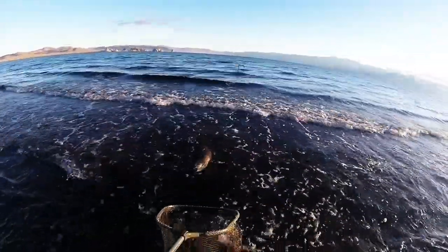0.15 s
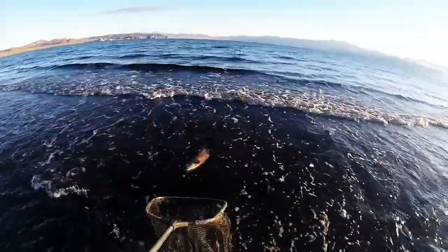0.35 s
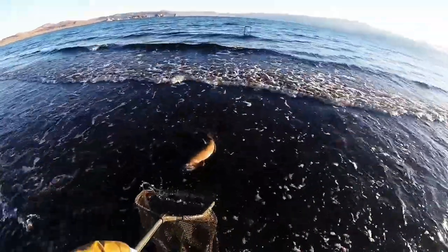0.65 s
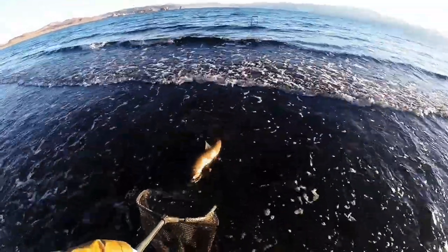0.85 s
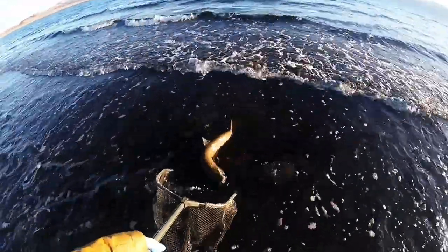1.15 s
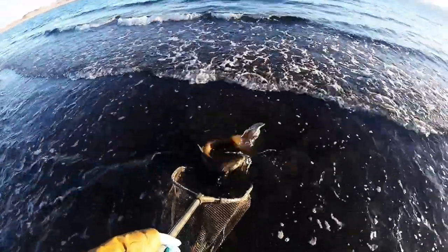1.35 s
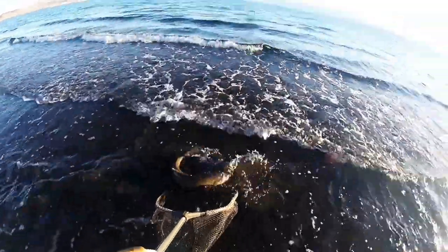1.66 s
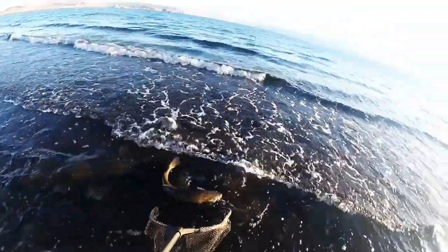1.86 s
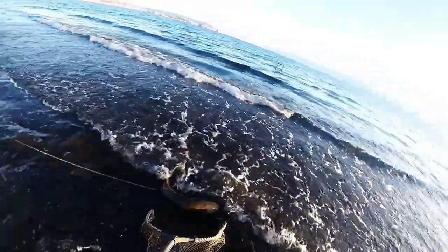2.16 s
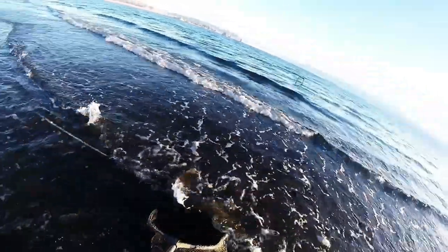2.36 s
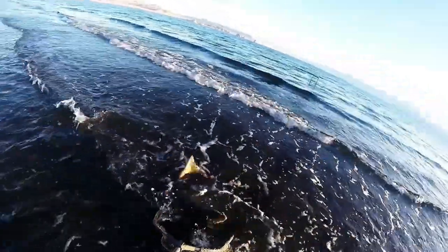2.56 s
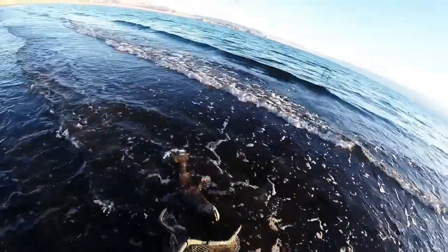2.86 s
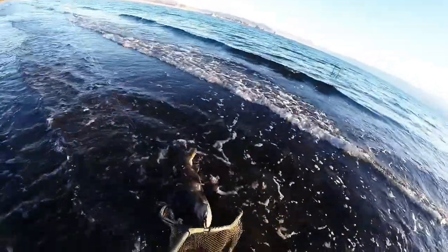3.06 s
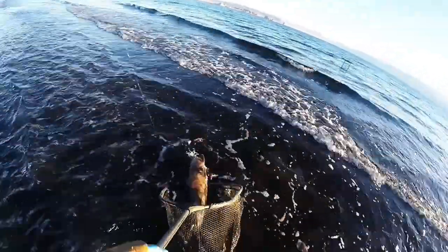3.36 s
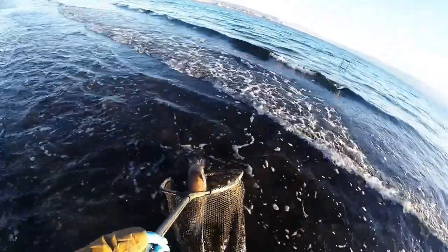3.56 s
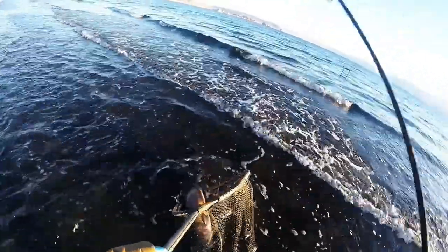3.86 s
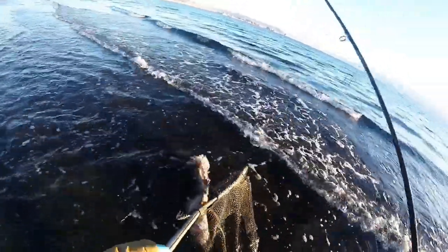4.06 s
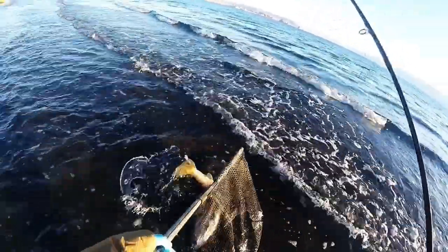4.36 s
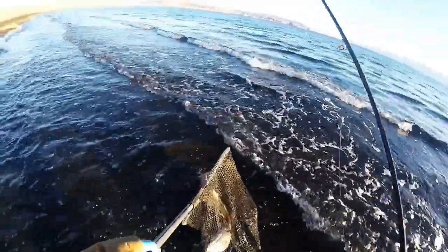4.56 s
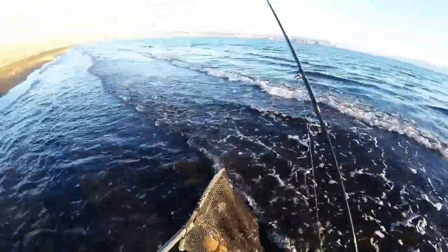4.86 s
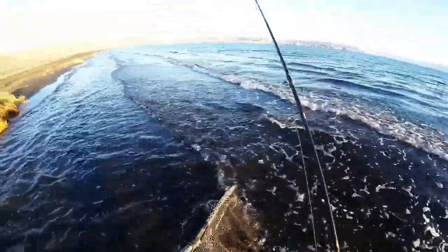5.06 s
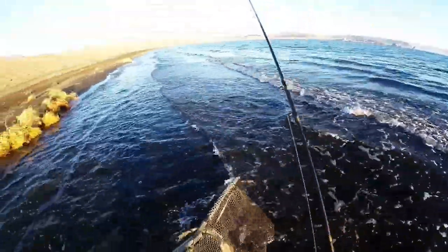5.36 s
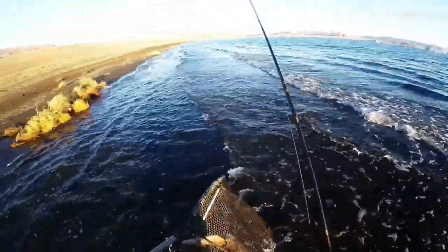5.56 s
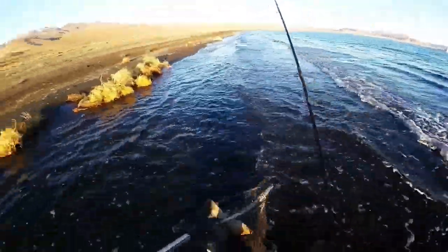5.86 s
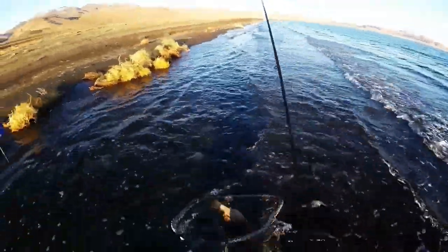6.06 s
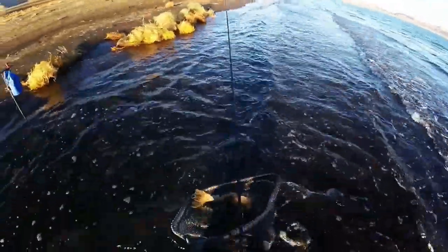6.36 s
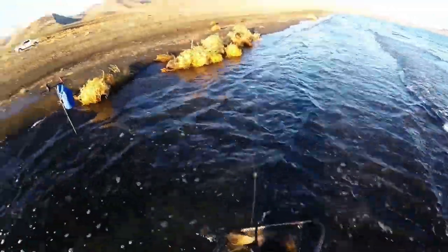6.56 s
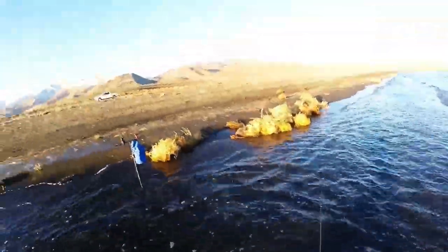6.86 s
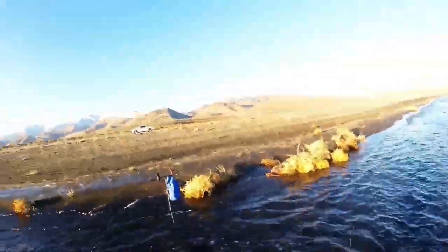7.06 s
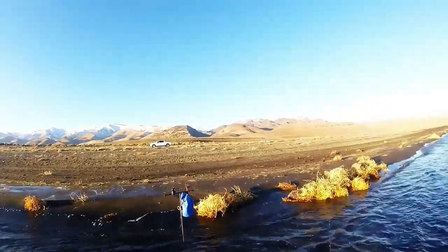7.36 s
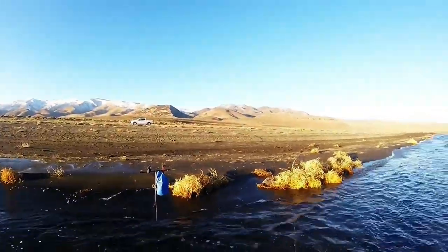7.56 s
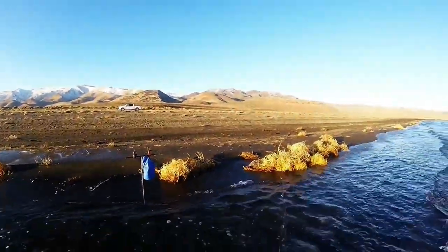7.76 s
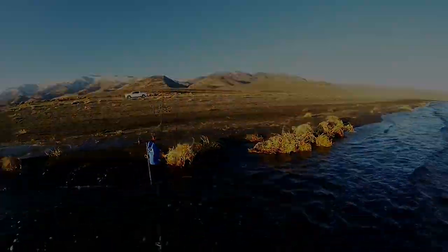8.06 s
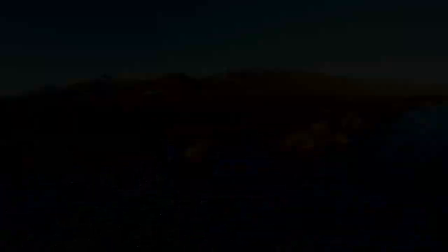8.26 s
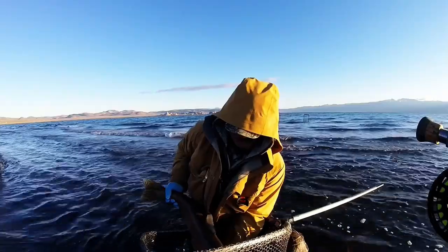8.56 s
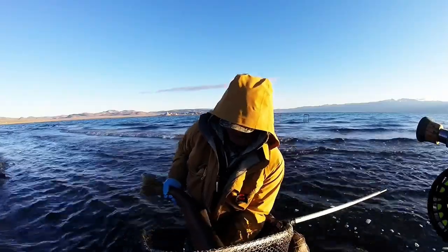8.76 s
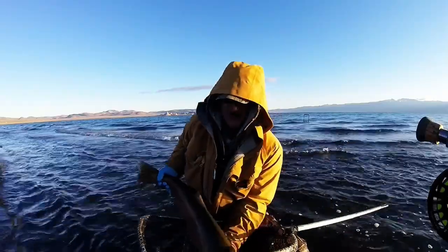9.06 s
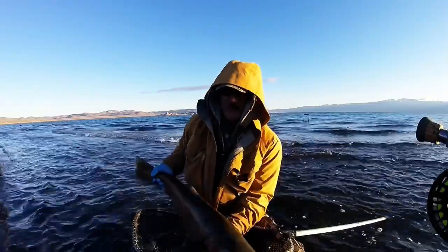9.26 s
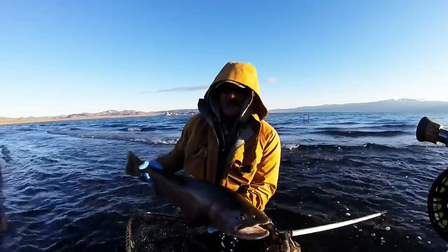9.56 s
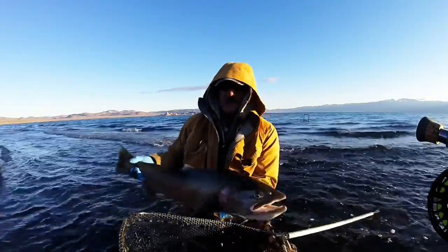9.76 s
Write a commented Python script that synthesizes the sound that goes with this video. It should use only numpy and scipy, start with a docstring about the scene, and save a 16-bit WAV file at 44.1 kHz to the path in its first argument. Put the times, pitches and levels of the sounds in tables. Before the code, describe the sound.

Small lake waves slosh, bubble and fizz close to a body-worn microphone from the start, with low wind rumble and bright ticks of spray. A fish thrashes at a landing net: light slaps come at about 0.6 and 1 second, the sharpest at 1.5, and more near 2.9, 3.4, 4.1 and 5 seconds, among foamy splashes and hollow gulps. Gusts buffet the microphone around 1.5 seconds, then build from 3 seconds to their heaviest thumping near 4, easing by 5. The water grows calmer after 6 seconds, with a small gust near 7. A faint, high ping of metal tackle sounds at 7.8 seconds, and everything fades to a brief silence. At 8.4 seconds quieter lapping opens close to the water, with small gurgles, drips and a dying breeze until about 10 seconds.

```python
"""Small waves break and fizz around an angler wading in a lake; their sound is many ringing bubbles.
A fish thrashes at the landing net with sharp slaps, air pockets gulp, and metal tackle pings once.
Gusts buffet a body-worn camera, whose waterproof case rings in the treble as spray hits it.
This first scene fades out, and a second, quieter one opens low over lapping water."""
import sys
import numpy as np
from scipy import signal
from scipy.fft import rfft, irfft, next_fast_len
from scipy.io import wavfile

SR = 44100
rng = np.random.default_rng(int(sys.argv[2]) if len(sys.argv) > 2 else 0)


def file_out(sig):
    """Save sig as 16-bit WAV at sys.argv[1]."""
    # one column per channel
    cols = np.atleast_2d(sig).T
    # limit, then scale
    lim = np.clip(cols, -1, 1)
    pcm = np.round(lim * 32767).astype(np.int16)
    wavfile.write(sys.argv[1], SR, pcm)


N = 437028
TIME = np.arange(N) / SR
FADE_START_S, SECOND_SCENE_S = 7.9, 8.41
GUST_RISE, SPLASH_RISE, LAP_RISE = 0.53, 0.51, 0.45  # share of each one's length spent rising

# How the waves swell in each scene.
# Each row: time in seconds, base level of the slosh in dB, base level of the breaking crests in dB.
WADING_SWELL = [(0, -37, -40), (0.3, -42, -44.5), (0.65, -39, -42.5), (1.35, -40.0, -44), (2, -38.5, -43.5),
                (2.6, -40, -43.0), (3.2, -43.0, -46.5), (4, -40, -42), (4.45, -39.5, -41.5),
                (5, -39.5, -43.0), (5.5, -42.0, -43.5), (5.82, -41.5, -47.5), (6.08, -44, -50),
                (6.65, -46.0, -50.5), (6.92, -42.0, -50.0), (7.15, -45.5, -51.5), (7.9, -43.5, -52.5)]
LAPPING_SWELL = [(8.44, -51, -57), (9, -50, -56), (9.45, -49.5, -56.5), (9.67, -46.0, -52.5),
                 (9.8, -48.5, -57), (9.89, -51.5, -58)]
# The tone of the water in each scene. Each row: frequency in Hz, relative strength in dB.
WADING_TONE = [(60, -35.5), (160, -4), (230, -0.5), (400, -1), (650, -5), (1180, -6.5), (1430, -12),
               (2000, -7.5), (2450, -8.5), (2950, -14.5), (3600, -17), (4400, -22), (8000, -19),
               (12500, -47)]
LAPPING_TONE = [(60, -27), (160, -4), (240, -3), (400, -3.5), (1000, -7), (1500, -9), (2600, -15),
                (3500, -22), (4300, -27), (6000, -25.5), (6900, -12.5), (9500, -26.5), (11000, -41),
                (13000, -36)]
# Thrown water and bursting foam.
# Each row: peak time in seconds, length in seconds, fizz level in dB, rush level in dB.
FOAMY_SPLASHES = [(0.16, 0.22, -47, -54), (0.46, 0.09, -40, -57), (0.61, 0.069, -41, -48),
                  (0.92, 0.18, -39, -45), (0.97, 0.062, -35.5, -41), (1.555, 0.063, -41, -46),
                  (1.73, .1, -39, -41.5), (2.21, .1, -37.5, -53), (2.31, 0.23, -41, -47),
                  (2.67, .08, -43, -47), (2.86, 0.098, -43, -48), (3.47, 0.4, -47, -51),
                  (4.46, 0.15, -38.5, -43), (4.75, 0.053, -39, -40), (5.38, 0.24, -38.5, -57),
                  (5.76, 0.45, -41, -46.5), (6.29, 0.087, -55, -50), (6.72, .05, -42.5, -58),
                  (6.98, 0.15, -50, -67), (7.68, 0.18, -47, -68), (7.79, .04, -46, -61),
                  (7.89, 0.062, -52, -56), (8.61, .05, -49, -67), (9.44, .14, -48, -70),
                  (9.565, 0.065, -48, -56), (9.865, 0.03, -43, -50)]
# Little waves close by. Each row: peak time in seconds, length in seconds, slosh level in dB.
NEAR_LAPS = [(1.545, 0.043, -38), (3.45, 0.029, -41.5), (4.18, .05, -41), (4.5, .05, -41),
             (6.945, .04, -45), (8.635, .06, -48.5), (8.77, .05, -51), (9.14, .08, -57)]
# Slaps on the water and the net. Each row: start in seconds, relative level in dB, main pitch in Hz.
FISH_SLAPS = [(0.582, -30, 2230), (0.994, -27, 2270), (1.5359, -11, 2360), (2.86, -23, 2160),
              (3.432, -29, 1790), (4.1479, -20.5, 1300), (4.998, -29, 2020)]
# Extra tones in a slap. Each row: pitch in Hz, level against the main tone in dB, ring time in seconds.
SLAP_TONES = [(760, -12, 0.027), (3620, 1, 0.0034)]
# Spray hitting the case. Each row: start in seconds, relative level in dB, rough pitch in Hz.
SPRAY_DROPS = [(0.4818, -22, 6410), (0.8704, -25, 7800), (1.5364, -23.5, 6440), (2.193, -23.5, 5750),
               (2.295, -19, 6160), (2.43, -25, 6540), (2.682, -15, 6750), (3.4323, -25.5, 6200),
               (3.685, -24, 6260), (4.462, -22, 6500), (4.7217, -22, 6370), (5.3767, -21, 6700),
               (5.3953, -24, 6370), (5.512, -23.5, 6260), (5.749, -22, 6400), (5.876, -24.5, 6900),
               (7.1571, -33, 5630), (8.5984, -30.5, 6850), (8.9675, -33, 6650), (9.2179, -35, 6840),
               (9.488, -30, 6950), (9.5595, -29, 6800), (9.866, -32, 6800)]
# Large pockets of air.
# Each row: start in seconds, relative level in dB, starting pitch in Hz, ring time in seconds.
AIR_POCKETS = [(0.392, -24, 314, 0.062), (0.714, -31, 503, 0.092), (2.29, -32, 360, 0.083),
               (3.586, -23, 203, 0.055), (4.169, -25, 505, 0.048), (4.953, -33, 355, 0.065),
               (5.613, -26, 266, 0.077), (5.671, -25.5, 430, 0.063), (8.611, -37.5, 372, 0.073),
               (8.749, -36, 316, 0.063), (9.146, -39, 677, 0.066), (9.537, -38, 450, 0.074),
               (9.688, -32.5, 428, 0.058)]
# Where the waterproof case rings. Each row: frequency in Hz, width in Hz, boost in dB.
CASE_RINGS = [(5570, 1400, 15.5), (6484, 380, 11), (7020, 690, 5), (10000, 3000, 9)]
# Wind hitting the case.
# Each row: peak time in seconds, length in seconds, rumble level in dB, flutter level in dB.
WIND_GUSTS = [(0.12, .22, -39, -32), (0.29, 0.05, -39, -34.5), (0.64, .08, -35.5, -43),
              (0.83, 0.048, -38, -36.5), (1.4, 0.25, -36, -37), (1.58, 0.35, -32, -38),
              (1.99, 0.07, -34, -43), (2.17, .14, -54, -52), (2.99, 0.34, -35, -43.5),
              (3.27, 0.14, -29, -33.5), (3.45, 0.2, -27, -30), (3.64, 0.36, -26, -31),
              (3.85, .1, -21.5, -23.5), (3.95, 0.16, -22, -42), (4.045, 0.083, -21, -27),
              (4.19, 0.092, -31.5, -45.5), (4.35, 0.26, -32, -42.5), (4.47, 0.11, -45, -35),
              (4.58, 0.16, -29, -53), (4.78, .25, -46, -50), (6.91, 0.079, -33, -67),
              (7.05, 0.083, -37.5, -55), (7.78, 0.19, -41.5, -64), (8.77, .06, -43.5, -58),
              (8.94, .11, -43, -59)]
# The tone of light wind, strong wind and flutter. Each row: frequency in Hz, relative strength in dB.
LIGHT_WIND_TONE = [(8, 14), (25, 0), (55, -7.5), (85, -14), (130, -35), (400, -63.5)]
STRONG_WIND_TONE = [(8, -14.5), (25, -6), (48, -0.5), (85, -8), (130, -21), (400, -75.5)]
FLUTTER_TONE = [(50, -24), (95, -3.5), (135, -6), (190, -10), (280, -22.5), (500, -37.5), (1500, -61)]


def waves(swell, tone, slosh_db, rush_db, foam_db, calm_db, lively_db,
          far_db, fizz_clump_db, trickle_db, foam_hz):
    """Large bubbles slosh, small ones rush in the crests, foam crackles and fine drips trickle."""
    times, *columns = np.transpose(swell)
    water_db, crest_db = (np.interp(TIME, times, column) for column in columns)
    slosh_level = lifted(water_db + slosh_db, surges(NEAR_LAPS, LAP_RISE))
    rush_level = lifted(crest_db + rush_db, surges(FOAMY_SPLASHES, SPLASH_RISE, column=1))
    fizz_level = lifted(crest_db + foam_db, surges(FOAMY_SPLASHES, SPLASH_RISE))  # crests leave foam
    large = bubbles(220, 1400, per_s=600, spread_db=2.5, cycles=24, rise=.15)
    medium = bubbles(350, 1600, per_s=400, spread_db=2.5, cycles=28, rise=.15)
    small = bubbles(1400, 4600, per_s=1200, spread_db=3, cycles=24, rise=.08)
    drips = bubbles(5500, 9500, per_s=250, spread_db=3.5, cycles=45, rise=.04)
    foam = unit_level(patter(per_s=1500, spread_db=4))
    deep = water_layer(large, tone, far_db, clump_db=.5, clump_hz=18, band_hz=(60.2, 1410))
    shallow = water_layer(medium, tone, far_db, clump_db=0, clump_hz=18, band_hz=(202, 1600))
    lively = np.clip((slosh_level - calm_db) / (lively_db - calm_db), 0, 1)
    slosh = np.sqrt(lively) * deep + np.sqrt(1 - lively) * shallow  # lively water traps larger bubbles
    rush = water_layer(small, tone, far_db, clump_db=0.77, clump_hz=22, band_hz=(1420, 4620))
    fizz = water_layer(foam + amp(trickle_db) * drips, tone, far_db=6.5,
                       clump_db=fizz_clump_db, clump_hz=35, band_hz=(foam_hz, 16000))
    return amp(slosh_level) * slosh + amp(rush_level) * rush + amp(fizz_level) * fizz


def water_layer(near, tone, far_db, clump_db, clump_hz, band_hz):
    """Near bubbles and the smooth wash of far ones arrive in clumps, heard through the case."""
    far = amp(far_db) * rng.standard_normal(N)
    water = (unit_level(near) + far) * amp(clump_db * wander(clump_hz))
    return unit_level(filtered(water, lambda hz: tone_db(tone, hz) + case_db(hz) + band_db(hz, *band_hz)))


def bubbles(lo_hz, hi_hz, per_s, spread_db, cycles, rise, sizes=28):
    """A cloud of bubbles of many sizes, each ringing for the same number of cycles."""
    out = np.zeros(N)
    for hz in np.geomspace(lo_hz, hi_hz, sizes):
        ring = hz * bubble(hz, cycles / hz, rise)
        births = patter(per_s / sizes, spread_db)
        starts = np.flatnonzero(births)
        positions = starts[:, None] + np.arange(len(ring))
        rings = np.outer(births[starts], ring)
        out += np.bincount(positions.ravel(), rings.ravel(), N)[:N]  # add each ring in its place
    return unit_level(out)


def bubble(hz, ring_s, rise):
    """An air pocket rings, rising in pitch as it nears the surface; it fades by 60 dB in ring_s."""
    t = np.arange(0, max(ring_s, 2 / hz), 1 / SR)
    ring = np.sin(2 * np.pi * hz * t * (1 + rise * t / ring_s))
    return ring * (1 - np.exp(-2 * hz * t)) * np.exp(-np.log(1000) * t / ring_s)


def slaps(gain_db=1, ring_s=0.0088, crack_db=-12, crack_s=0.0029):
    """A fish's tail or thrown water lands with a crack and a very short, hollow ring."""
    out, t = np.zeros(N), np.arange(1024) / SR
    for start, db, hz in FISH_SLAPS:
        ring = sum(amp(level) * np.sin(2 * np.pi * pitch * t) * np.exp(-np.log(1000) * t / decay)
                   for pitch, level, decay in [(hz, 0, ring_s), *SLAP_TONES])
        noise = filtered(rng.standard_normal(len(t)), lambda f: band_db(f, hz / 2, 2 * hz))
        crack = unit_level(noise) * np.exp(-t / crack_s)
        hit = (ring + amp(crack_db) * crack) * (1 - np.exp(-hz * t))
        add(out, start, amp(db + gain_db) * hit / abs(hit).max())
    return out


def drops(gain_db=1.5, splat_s=0.00057, usual_db=-25):
    """Each drop of spray splatters for a moment, longer if it is large, and rings the case."""
    out, t = np.zeros(N), np.arange(1024) / SR
    for start, db, pitch in SPRAY_DROPS:
        decay_s = splat_s * max(1, amp((db - usual_db) / 2))
        splat = rng.standard_normal(len(t)) * t * np.exp(-t / decay_s)
        tick = filtered(splat, lambda hz: case_db(hz) / 2 + band_db(hz, pitch / 1.14, pitch * 1.07, 24))
        add(out, start, amp(db + gain_db) * tick / abs(tick).max())
    return out


def gulps(gain_db=-1, rise=0.14, shed_db=-8, shed_within_s=0.035, shed_count=3):
    """Water closes over a large pocket of air, which sheds a few smaller bubbles."""
    out = np.zeros(N)
    for start, db, hz, ring_s in AIR_POCKETS:
        add(out, start, amp(db + gain_db) * bubble(hz, ring_s, rise))
        for delay, octaves in rng.random((shed_count, 2)):
            smaller = bubble(hz * 2 ** octaves, ring_s / 2 ** octaves, rise)
            add(out, start + delay * shed_within_s, amp(db + gain_db + shed_db) * smaller)
    return out


def tackle(start_s=7.78, db=-47, hz=9200, ring_s=0.29):
    """A small piece of metal tackle pings once: a fading tone of steady pitch."""
    out = np.zeros(N)
    add(out, start_s, amp(db) * bubble(hz, ring_s, rise=0))
    return out


def wind(rumble_db, flutter_db, band_hz, dying_db_per_s=0, light_db=-46, strong_db=-32, wobble_db=0.9):
    """Big swirls of air thump on the case, higher-pitched in harder gusts, while small ones flutter."""
    lull_db = dying_db_per_s * np.maximum(TIME - SECOND_SCENE_S, 0)  # the breeze drops in scene two
    rumble_level = lifted(rumble_db - lull_db, surges(WIND_GUSTS, GUST_RISE))
    flutter_level = lifted(flutter_db - lull_db, surges(WIND_GUSTS, GUST_RISE, column=1))
    force = np.clip((rumble_level - light_db) / (strong_db - light_db), 0, 1)
    light, strong, flutter = (
        unit_level(filtered(rng.standard_normal(N), lambda hz: tone_db(tone, hz) + band_db(hz, *band_hz)))
        for tone in (LIGHT_WIND_TONE, STRONG_WIND_TONE, FLUTTER_TONE))
    rumble = np.sqrt(1 - force) * light + np.sqrt(force) * strong
    swirls = amp(rumble_level) * rumble + amp(flutter_level) * flutter
    return swirls * unit_level(amp(wobble_db * wander(rate_hz=14)))


def case_db(hz):
    """The waterproof case boosts the treble around the pitches where it rings."""
    return sum(db / (1 + (2 * (hz - pitch) / width) ** 2) for pitch, width, db in CASE_RINGS)


def surges(rows, rise_share, column=0):
    """The total power of smooth rises and falls; column picks which of a row's levels to use."""
    power = np.zeros(N)
    for peak_s, length, *levels_db in rows:
        t = np.arange(-2 * length, 2 * length, 1 / SR)
        t = t[t >= -peak_s]
        width = length * np.where(t < 0, rise_share, 1 - rise_share)
        surge = amp(levels_db[column]) * np.exp(-(t / width) ** 2)
        add(power, peak_s + t[0], surge ** 2)
    return power


def lifted(steady_db, power):
    """The level in dB of a steady sound with surges on top."""
    return 10 * np.log10(amp(steady_db) ** 2 + power)


def patter(per_s, spread_db):
    """Scattered clicks, positive or negative, most small and a few large."""
    when, size, sign = rng.random((round(per_s * N / SR), 3)).T
    sizes = amp(spread_db * np.minimum(-np.log(1 - size), 4))
    return np.bincount((when * N).astype(int), sizes * np.sign(sign - .5), N)


def wander(rate_hz):
    """A smooth random drift, mostly slower than rate_hz."""
    size = next_fast_len(N)
    hz = np.fft.rfftfreq(size, 1 / SR)
    spectrum = rfft(rng.standard_normal(size)) / (1 + (hz / rate_hz) ** 2)
    return unit_level(irfft(spectrum, size)[:N])


def filtered(x, db_at, size=8192):
    """Turn each frequency up or down by db_at(hz); any ringing follows the sound, never leads it."""
    log_gain = np.log(amp(db_at(abs(np.fft.fftfreq(size, 1 / SR)))) + 1e-6)
    taps = np.fft.ifft(np.exp(np.conj(signal.hilbert(log_gain)))).real
    return signal.oaconvolve(x, taps[:size // 2])[:len(x)]


def band_db(hz, lo_hz, hi_hz, steepness=10):
    """A gain in dB that is flat between two edges and falls quickly outside them."""
    return -10 * np.log10((1 + (lo_hz / (hz + 1)) ** steepness) * (1 + (hz / hi_hz) ** steepness))


def tone_db(tone, hz):
    """Look up a tone table at any frequency, sliding between its rows."""
    row_hz, row_db = np.transpose(tone)
    return np.interp(np.log(hz + 1), np.log(row_hz), row_db)


def amp(db):
    """Turn decibels into a number to multiply by."""
    return 10 ** (np.asarray(db) / 20)


def unit_level(x):
    """Scale a signal to an average power of one."""
    return x / np.sqrt(np.mean(x ** 2) + 1e-20)


def add(mix, start_s, sound):
    """Mix a sound in at the given time."""
    part = mix[max(round(start_s * SR), 0):][:len(sound)]
    part += sound[:len(part)]


def scene(fade_db_per_s=112, opening_s=0.028, hiss_db=-67):
    """Wading, a fade to silence, then quiet lapping; both ears hear the same."""
    wading = waves(WADING_SWELL, WADING_TONE, slosh_db=0.15, rush_db=0, foam_db=2.5, calm_db=-48,
                   lively_db=-38, far_db=12.5, fizz_clump_db=0.94, trickle_db=-3, foam_hz=4700)
    wading += wind(rumble_db=-44.5, flutter_db=-56, band_hz=(12, 900))
    lapping = waves(LAPPING_SWELL, LAPPING_TONE, slosh_db=-0.4, rush_db=1.5, foam_db=6.5, calm_db=-65,
                    lively_db=-42.5, far_db=8, fizz_clump_db=1.4, trickle_db=0, foam_hz=5300)
    lapping += wind(rumble_db=-51.5, flutter_db=-51, band_hz=(32.5, 137), dying_db_per_s=2.5)
    hiss = amp(hiss_db) * rng.standard_normal(N)  # the microphone's own noise
    closing = np.clip((SECOND_SCENE_S - TIME) * 10 - .5, 0, 1)  # full silence just before scene two
    fade_out = amp(-fade_db_per_s * np.maximum(TIME - FADE_START_S, 0)) * closing
    fade_in = np.clip((TIME - SECOND_SCENE_S) / opening_s, 0, 1)
    lake = (wading + hiss) * fade_out + (lapping + hiss) * fade_in
    mono = lake + slaps() + drops() + gulps() + tackle()
    return np.array([mono, mono])


def record(dry):
    """The camera cuts off the highest treble."""
    cutoff_hz = 13200
    low_pass = signal.firwin(255, cutoff_hz, window=("kaiser", 9), fs=SR)
    return signal.oaconvolve(dry, low_pass[None], "same")


dry = scene()
out = record(dry)
file_out(out)
```